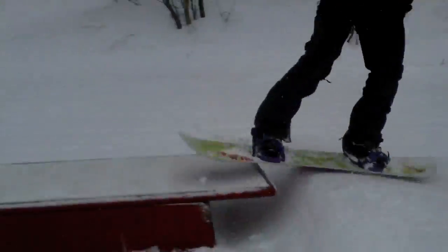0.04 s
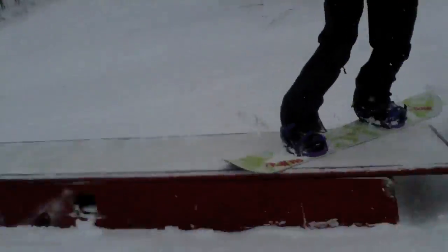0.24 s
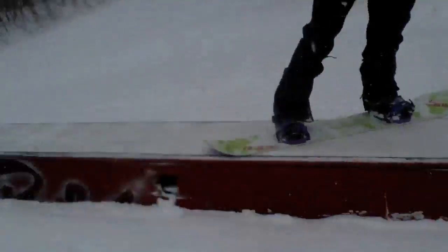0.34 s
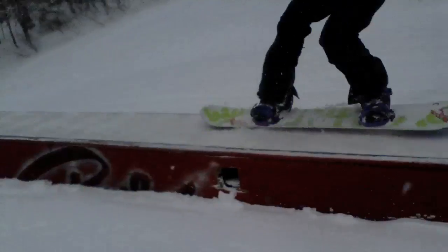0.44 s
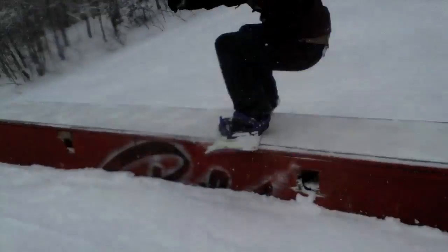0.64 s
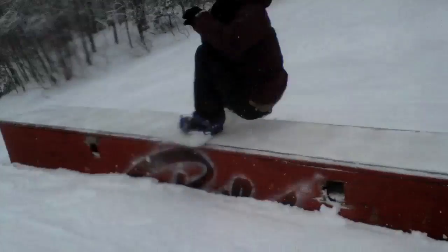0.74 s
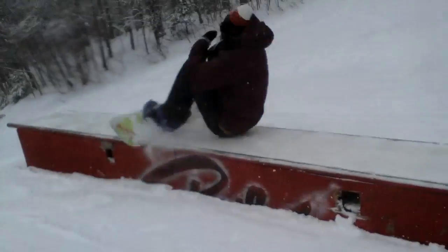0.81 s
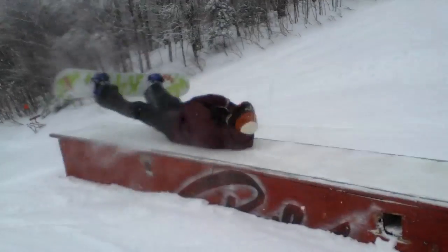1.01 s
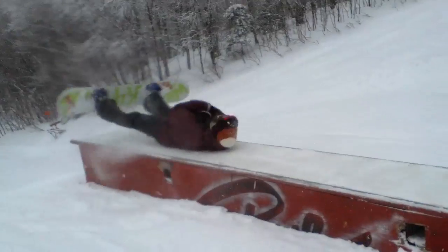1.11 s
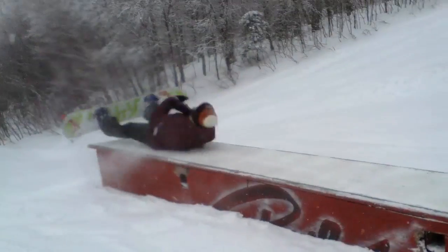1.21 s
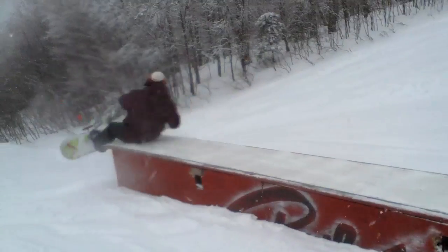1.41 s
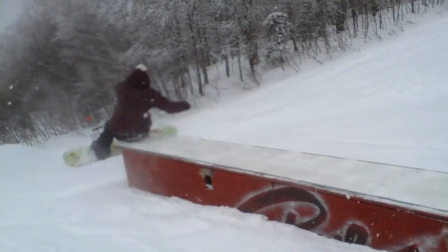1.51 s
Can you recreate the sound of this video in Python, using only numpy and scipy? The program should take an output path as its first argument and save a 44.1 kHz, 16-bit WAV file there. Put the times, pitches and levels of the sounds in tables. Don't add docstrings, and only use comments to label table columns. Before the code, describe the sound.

A snowboard scrapes over snow, slaps onto a hollow box, grinds, crashes and slides off

```python
import sys
import numpy as np
from scipy import signal
from scipy.io import wavfile
from scipy.ndimage import uniform_filter1d

SR = 44100
rng = np.random.default_rng(int(sys.argv[2]) if len(sys.argv) > 2 else 0)


def boost_factor(decibels):
    exponent = np.asarray(decibels, float) / 20
    return 10 ** exponent


def file_out(sig):
    cols = np.atleast_2d(sig).T
    lim = np.clip(cols, -1, 1)
    pcm = np.round(lim * 32767).astype(np.int16)
    wavfile.write(sys.argv[1], SR, pcm)


N = 68355
T = np.arange(N) / SR

# time in seconds, pressure in dB, brightness in dB per octave.
CONTACT_STAGES = [
    [(0, -28.5, 2), (.06, -31.5, 0), (.105, -28, 2), (.114, -36.5, -1.5), (.15, -36.5, 11),
     (.175, -43.5, 2), (.2, -35.5, -1.5), (.241, -39, 0)],
    [(.244, -20, -0.5), (.34, -22.5, 3), (.37, -23, 0.5), (.42, -22.5, 4.5), (.468, -26, 6.5),
     (.478, -27.5, 2.5), (.515, -26, 1), (.524, -43, -1), (.59, -40, 0)],
    [(.6, -31, -2), (.668, -31, -2), (.678, -25.5, -0.5), (.79, -27, 0.8), (.885, -18.5, 0.4),
     (.892, -27, -21), (.925, -33.5, 0), (.97, -30, 2.5), (1.01, -35, 3)],
    [(1.06, -32.5, 3), (1.2, -36, 2), (1.212, -28, -1.5), (1.33, -33, 1), (1.41, -35, 1), (1.416, -35.5, 1),
     (1.475, -38, -1), (1.5, -36, -1.5), (1.55, -39, -0.5)],
]
# start in seconds, peak in dB, ring pitch in Hz,
# time for the ring to fall 60 dB in seconds, crack level in dB.
BOARD_KNOCKS = [(.099, -20, 1440, 0.024, 9.5), (0.141, -34, 4440, .02, -10), (0.196, -24, 3120, 0.016, 7),
                (0.2435, 2.5, 1418, 0.075, -3.5), (0.2434, 2, 2010, 0.025, -1),
                (0.2651, -4.5, 2100, 0.035, 6.5), (0.2661, 2.5, 1516, 0.051, -4),
                (.2905, -5, 2163, 0.12, -4), (0.3404, -5, 3275, 0.029, -3), (0.6225, -3, 4650, 0.043, 6),
                (0.6377, -6.5, 5245, 0.025, 4), (.7302, 3.5, 2100, 0.0073, 4.5),
                (0.755, -4.5, 1980, 0.029, -27), (0.804, -3, 2616, 0.028, -0.5),
                (0.821, -6.5, 2270, 0.032, 5.5), (0.898, -6, 2870, 0.02, -6), (1.016, -11, 5300, 0.016, -2),
                (1.2042, -10, 3590, 0.026, -18), (1.2098, -3, 2300, 0.032, -26),
                (1.291, -12, 2860, 0.029, 6.5), (1.363, -19, 3080, 0.084, 0),
                (1.4039, -14.5, 1910, 0.019, 8), (1.486, -15.5, 4330, 0.037, 5)]
# peak time in seconds, peak in dB, pitch at the peak in Hz,
# build-up in seconds, pitch drop in octaves per millisecond.
BOARD_SNAPS = [(0.2432, -2.5, 2616, 0.00027, 0.31), (0.2439, -2.5, 1484, .0008, .03),
               (0.2602, -19, 1650, .001, .02), (0.2646, -6, 4646, 0.00061, 0.038),
               (.2668, -7, 1904, 0.0009, 0.059), (0.6221, -5.5, 5690, .0005, 0.033),
               (0.6235, -4.5, 2211, 0.00035, 0.043), (0.6386, -4, 5500, 0.00047, 0.016),
               (0.6408, -4, 3210, 0.00054, .03), (0.6772, -12, 1500, 0.00028, .03),
               (.703, -11.5, 3530, 0.00087, .03), (0.73, -3.5, 2371, 0.00018, .1),
               (.787, -14, 4490, 0.00061, .05), (0.8842, -8.5, 2370, 0.00044, .05),
               (.8985, -10, 3220, 0.00026, .05), (0.9588, -15, 2995, 0.00057, .03),
               (1.107, -30.5, 2030, 0.0011, -0.0013), (1.207, -1.5, 2110, 0.00045, .03),
               (1.2072, -10, 3490, 0.0007, .1), (1.2084, -2, 2600, 0.00052, .3),
               (1.2107, -14.5, 4460, 0.00043, .02), (1.224, -19, 3330, 0.0014, -0.031),
               (1.292, -23, 4240, 0.00091, 0.047), (1.298, -30, 2700, 0.0005, .06),
               (1.3624, -19, 2600, 0.00037, -.05), (1.378, -19, 3900, .0002, .1),
               (1.387, -24, 1945, 0.00042, .05), (1.3992, -11, 2205, 0.00015, 0.094),
               (1.4055, -21, 4580, 0.00067, -0.018), (1.408, -27, 2530, 0.00027, 0.14)]
# start in seconds, length in seconds, level in dB, centre in Hz.
EDGE_SKIDS = [(0.285, 0.011, -15.5, 2000), (0.312, 0.029, -18.5, 1980), (0.384, 0.06, -24.5, 6340),
              (0.456, 0.012, -19.5, 3300), (0.505, 0.011, -31, 7050), (0.571, 0.0037, -35.5, 4600),
              (0.635, 0.016, -16.5, 4800), (0.675, 0.017, -22, 2230), (0.697, 0.016, -21, 4620),
              (0.722, 0.012, -16, 730), (0.742, 0.021, -20.5, 5140), (0.782, 0.0037, -19.5, 5300),
              (0.83, 0.0091, -47, 4150), (0.866, 0.029, -29.5, 3450), (0.897, 0.014, -17.5, 8600),
              (0.936, 0.021, -19.5, 3870), (0.984, 0.013, -28.5, 770), (1.117, 0.012, -33.5, 2570),
              (1.229, 0.046, -30.5, 3180), (1.294, 0.0083, -25, 1860), (1.388, 0.018, -28.5, 2490),
              (1.488, 0.0099, -31, 4730)]
# start in seconds, level in dB, pitch in Hz, time to fall 60 dB in seconds.
BOX_THUMPS = [(0.089, -38, 350, 0.13), (.228, -18, 590, 0.012), (0.2418, -33.5, 150, 0.13),
              (.245, -12.5, 628, 0.045), (0.267, -16.5, 543, 0.08), (.29, -37, 183, 0.14),
              (.5, -43.5, 353, 0.13), (0.6222, -4, 692, 0.03), (0.652, -42, 196, 0.22),
              (.73, -37, 203, 0.25), (0.724, -11.5, 485, 0.05), (0.731, -8.5, 1050, 0.033),
              (.75, -8, 700, 0.018), (.79, -39.5, 140, 0.21), (.9, -40, 222, 0.18),
              (0.951, -41.5, 93, 0.17), (0.991, -33, 217, 0.1), (1.042, -54, 80, 0.245),
              (1.291, -31.5, 235, 0.059), (1.366, -32, 307, 0.052), (1.397, -32, 193, 0.039),
              (.2426, -36, 70, .06), (0.728, -29.5, 350, .07)]
# time in seconds, pitch in Hz, level in dB.
EDGE_SQUEAK = [
    (0.968, 1806, -61),
    (0.974, 1805, -29),
    (0.98, 1886, -24),
    (0.988, 1833, -23.5),
    (0.993, 1730, -30),
    (0.997, 1600, -50),
]
# time in seconds, pitch in Hz, level in dB.
EDGE_GROAN = [
    (.862, 1950, -27),
    (.871, 2127, -12),
    (.875, 2590, -39),
    (.883, 3330, -9.5),
    (.889, 3650, -15.5),
]
# start in seconds, level in dB, length in seconds.
DUST_PUFFS = [
    (.2428, -42, .002),
    (.2642, -45, 0.0026),
    (.43, -56, 0.037),
    (.505, -48, 0.013),
    (.6232, -39, .0015),
    (.638, -50, .005),
    (.729, -42, 0.0028),
    (.899, -43, .015),
    (1.2076, -50, 0.0012),
    (1.3, -54, .02),
]
# frequency in Hz, level in dB per Hz.
SCRAPE_COLOUR = [(30, -48), (300, -18), (650, -1), (2000, 0), (5300, -3), (8000, -25.5), (14500, -50),
                 (16500, -60)]
# frequency in Hz, level in dB per Hz.
CRACK_COLOUR = [(30, -48), (300, -14.5), (1500, 3.5), (5300, 1.5), (8000, -24), (14500, -56), (16500, -64)]
# frequency in Hz, level in dB per Hz.
AIR_COLOUR = [(30, -66), (200, -37), (700, 14), (2000, -12), (5000, -7), (8000, -17), (14500, -44),
              (16500, -65)]

GRAINS_PER_S, GRAIN_SPREAD_DB, GRAIN_CYCLES, HISS_DB = 6000, 3, 2.6, 2
PATCH_DB, FLICKER_DB = 2, 1
SKID_RISE_S, SKID_STOP_S, SKID_Q, SKID_WIDE_DB = 0.0041, 0.0053, 3, 4.5
CRACK_SHARE = 0.94
CRACK_DB, RING_DB, TICK_DB = -14, -10, -5
RING_ROUGH, RING_PARTNER, PARTNER_DB = 0.8, 1.32, -8.5
SNAP_FALL = 0.85
TONE_FROM_HZ = 420
PUFF_HZ, PUFF_WIDTH_HZ = 11100, 5800
FIZZ_DB, FIZZ_HZ, FIZZ_WIDTH_HZ, FIZZ_FOLLOW = -57, 9300, 6600, 0.52
RUMBLE_DB, RUMBLE_HZ, RUMBLE_WIDTH_HZ, RUMBLE_FOLLOW = -60, 150, 220, 0.41
RUN_UP_DB, LANDING_S = -4.5, 0.275
AIR_DB = -52.5
MIC_LOW_HZ, MIC_TOP_HZ, CLIP = 74.5, 15300, 0.94


def evened(x):
    return x / np.sqrt(np.mean(x ** 2) + 1e-20)


def add(mix, s, sound):
    part = mix[round(s * SR):][:len(sound)]
    part += sound[:len(part)]


def coloured(x, points):
    f, db = np.transpose(points)
    hz = abs(np.fft.fftfreq(8192, 1 / SR)) + 1
    log_gain = np.log(boost_factor(np.interp(np.log(hz), np.log(f), db)))
    taps = np.fft.ifft(np.exp(np.conj(signal.hilbert(log_gain)))).real[:4096]
    return signal.oaconvolve(x, taps / np.linalg.norm(taps))[:len(x)]


def resonate(x, hz, width):
    return signal.lfilter(*signal.iirpeak(hz, max(hz / width, 0.3), SR), x)


def noise_band(n, hz, width):
    noise = rng.standard_normal(n)
    return evened(resonate(resonate(noise, hz, width), hz, width))


def contact():
    return np.concatenate(CONTACT_STAGES).T


def grit():
    strength_db = GRAIN_SPREAD_DB * np.minimum(rng.exponential(1, N), 3.5)
    grains = boost_factor(strength_db) * (rng.random(N) < GRAINS_PER_S / SR)
    kind = rng.integers(0, 24, N)
    t = np.arange(600) / SR
    cracks = np.zeros(N)
    for k, hz in enumerate(np.geomspace(300, 13000, 24)):
        ring = np.exp(-t * hz * 3 / GRAIN_CYCLES) * np.sin(2 * np.pi * hz * t) * hz
        cracks += signal.oaconvolve(grains * (kind == k), ring)[:N]
    hissing = evened(cracks) + boost_factor(HISS_DB) * rng.standard_normal(N)
    z = signal.stft(hissing, nperseg=256, noverlap=192)[2]
    z = z / np.sqrt(np.mean(abs(z) ** 2, axis=1, keepdims=True))
    patches = uniform_filter1d(rng.standard_normal(z.shape), size=5, axis=0)
    patches = evened(uniform_filter1d(patches, size=8, axis=1))
    flicker = evened(uniform_filter1d(rng.standard_normal(z.shape[1]), size=4))
    z = z * boost_factor(PATCH_DB * patches + FLICKER_DB * flicker)
    rough = signal.istft(z, nperseg=256, noverlap=192)[1][:N]
    return evened(coloured(rough, SCRAPE_COLOUR))


def slide(surface):
    s, db, tilt_db = contact()
    hz, t, z = signal.stft(surface, SR, nperseg=256, noverlap=192)
    octaves = np.log2(np.clip(hz, 500, 9000) / 2000)[:, None]
    tip_db = octaves * np.clip(np.interp(t, s, tilt_db), -2.5, 4)
    tipped = signal.istft(z * boost_factor(tip_db), SR, nperseg=256, noverlap=192)[1][:N]
    return tipped * boost_factor(np.interp(T, s, db))


def skids(surface):
    out = np.zeros(N)
    for start, length, db, hz in EDGE_SKIDS:
        t = np.arange(0, length + 0.03, 1 / SR)
        part = surface[round(start * SR):][:len(t)]
        shape = np.minimum(t / SKID_RISE_S, 1) * np.exp(-np.maximum(t - length, 0) / SKID_STOP_S)
        band = evened(resonate(part, hz, hz / SKID_Q))
        add(out, start, boost_factor(db) * shape * evened(band + boost_factor(SKID_WIDE_DB) * part))
    return out


def knocks():
    out = np.zeros(N)
    t = np.arange(0, 0.15, 1 / SR)
    board_band = signal.butter(3, [400, 6200], "band", fs=SR)
    for s, db, hz, t60, crack_db in BOARD_KNOCKS:
        burst = boost_factor(CRACK_DB - 60 * t / (CRACK_SHARE * t60)) * rng.standard_normal(len(t))
        burst += boost_factor(TICK_DB) * (t == 0)
        ring = np.sin(2 * np.pi * hz * t)
        ring += boost_factor(PARTNER_DB) * np.sin(2 * np.pi * RING_PARTNER * hz * t)
        ring += RING_ROUGH * evened(resonate(rng.standard_normal(len(t)), hz, hz / 2))
        onset = np.sin(np.minimum(t / 0.0013, 1) * np.pi / 2) ** 2
        ring *= onset * boost_factor(RING_DB - 60 * t / t60)
        cracks = boost_factor(crack_db) * coloured(burst, CRACK_COLOUR)
        add(out, s, boost_factor(db) * (cracks + signal.lfilter(*board_band, ring)))
    return out


def snaps():
    out = np.zeros(N)
    t = np.arange(-0.006, 0.012, 1 / SR)
    for s, db, hz, rise, drop in BOARD_SNAPS:
        pitch_hz = np.clip(hz * 2 ** (-drop * t / 0.001), 500, 6500)
        shape = np.where(t < 0, np.exp(-(t / rise) ** 2), 1 / np.cosh(t / (SNAP_FALL * rise)))
        add(out, s + t[0], boost_factor(db) * shape * np.sin(2 * np.pi * np.cumsum(pitch_hz) / SR))
    return out


def thumps():
    out = np.zeros(N)
    t = np.arange(0, 0.3, 1 / SR)
    for s, db, hz, t60 in BOX_THUMPS:
        push = noise_band(len(t), hz, hz)
        body = np.sin(2 * np.pi * hz * t) + 0.089 * push if hz > TONE_FROM_HZ else push
        onset = np.sin(np.minimum(t * hz / 2.3, 1) * np.pi / 2) ** 2
        add(out, s, onset * boost_factor(db - 60 * t / t60) * body)
    return out


def squeak(track, wobble):
    s, hz, db = np.transpose(track)
    shake = 1 + wobble * evened(uniform_filter1d(rng.standard_normal(N), size=60))
    level = uniform_filter1d(boost_factor(np.interp(T, s, db, -99, -99)), size=90)
    phase = 2 * np.pi * np.cumsum(np.interp(T, s, hz) * shake) / SR
    return np.sqrt(2) * level * np.sin(phase)


def puffs():
    level = np.zeros(N)
    for s, db, length in DUST_PUFFS:
        half = length / 2
        level += boost_factor(db) * np.exp(-((T - s - half) / half) ** 4)
    return level * noise_band(N, PUFF_HZ, PUFF_WIDTH_HZ)


def fizz():
    s, db, tilt_db = contact()
    load_db = np.interp(T, s, db + 25.5 + 2 * np.clip(tilt_db, -2.5, 4))
    return boost_factor(FIZZ_DB + FIZZ_FOLLOW * load_db) * noise_band(N, FIZZ_HZ, FIZZ_WIDTH_HZ)


def rumble():
    s, db, _ = contact()
    load_db = uniform_filter1d(np.interp(T, s, db) + 24.5, size=1500)
    level_db = RUMBLE_DB + RUMBLE_FOLLOW * load_db + RUN_UP_DB * (T < LANDING_S)
    return boost_factor(level_db) * noise_band(N, RUMBLE_HZ, RUMBLE_WIDTH_HZ)


def still_air():
    return boost_factor(AIR_DB) * coloured(rng.standard_normal(N), AIR_COLOUR)


def scene():
    surface = grit()
    board = slide(surface) + knocks() + snaps()
    edge = skids(surface[::-1])
    edge += squeak(EDGE_SQUEAK, wobble=0.021) + squeak(EDGE_GROAN, wobble=0.058)
    mix = board + edge + thumps() + puffs() + fizz() + rumble() + still_air()
    return mix[None]


def low_pass(x):
    return signal.sosfilt(signal.butter(12, 16460, fs=SR, output="sos"), x)


def record(dry):
    thin = signal.lfilter(*signal.butter(1, MIC_LOW_HZ, "high", fs=SR), dry)
    overloaded = np.clip(thin, -CLIP, CLIP)
    treble_limit = signal.butter(20, MIC_TOP_HZ, fs=SR, output="sos")
    return low_pass(signal.sosfilt(treble_limit, overloaded))


dry = scene()
out = record(dry)
file_out(out)
```